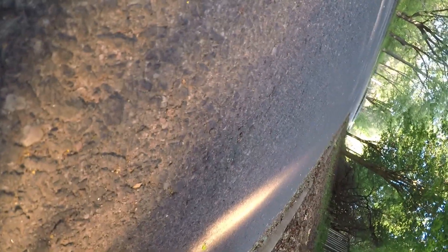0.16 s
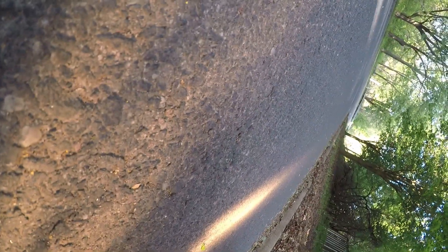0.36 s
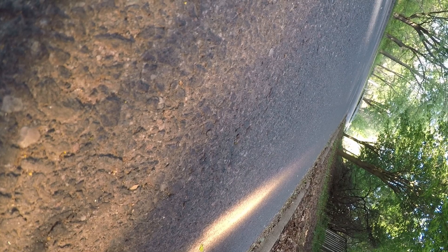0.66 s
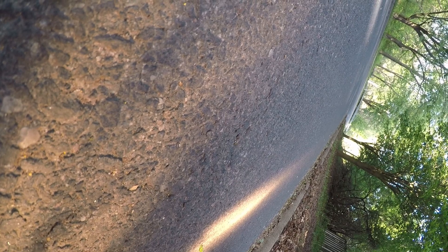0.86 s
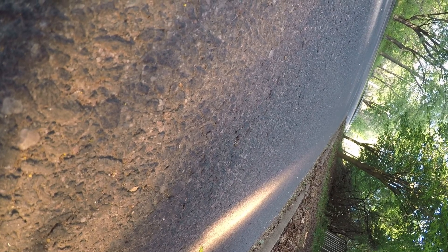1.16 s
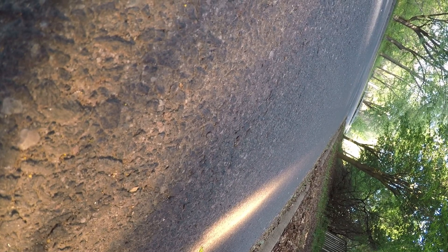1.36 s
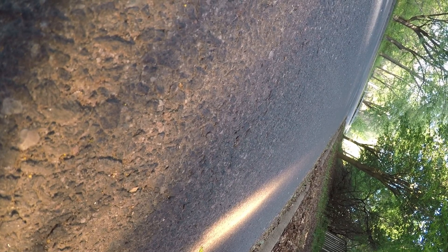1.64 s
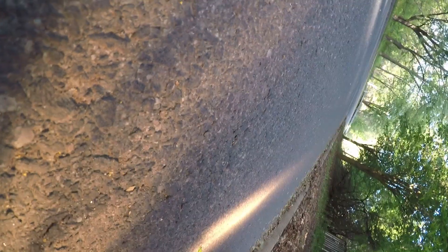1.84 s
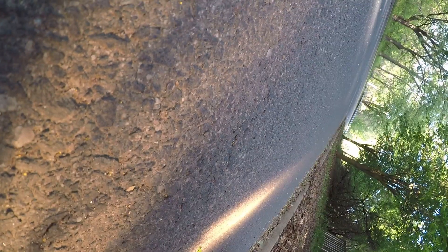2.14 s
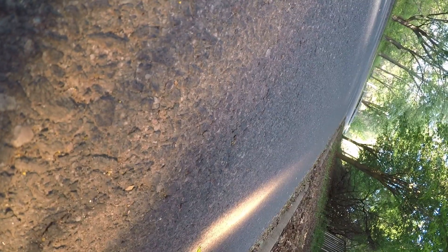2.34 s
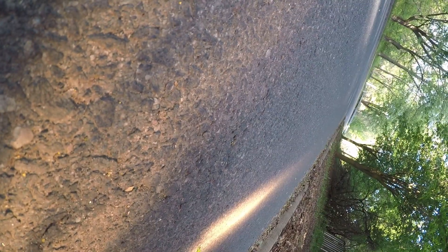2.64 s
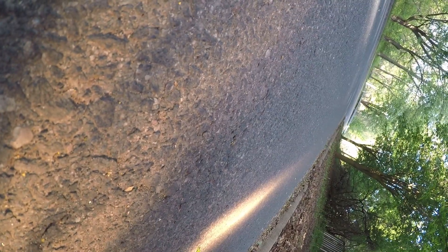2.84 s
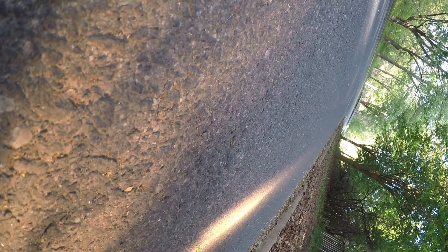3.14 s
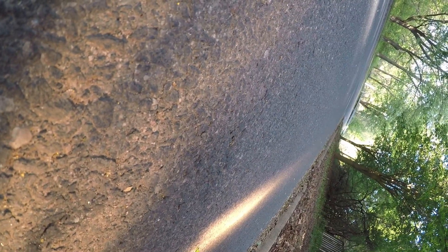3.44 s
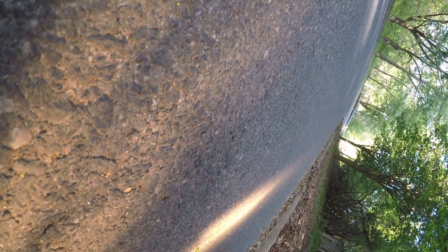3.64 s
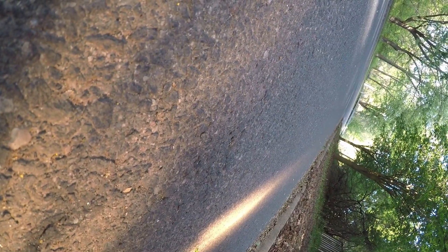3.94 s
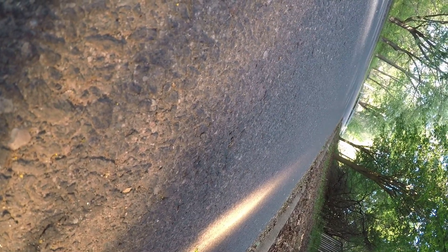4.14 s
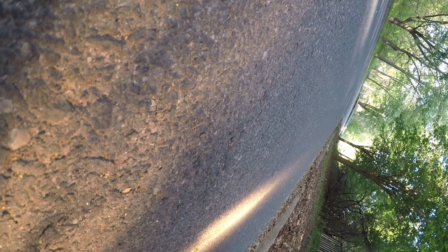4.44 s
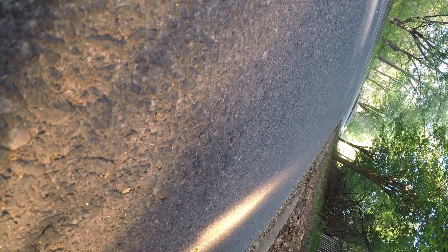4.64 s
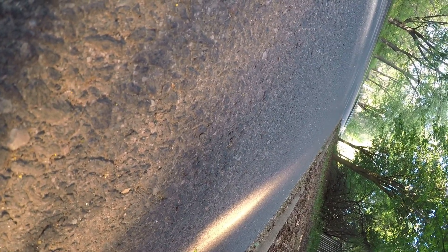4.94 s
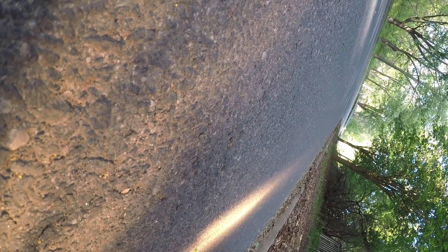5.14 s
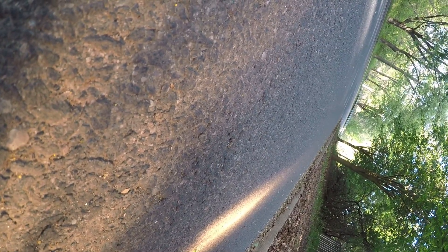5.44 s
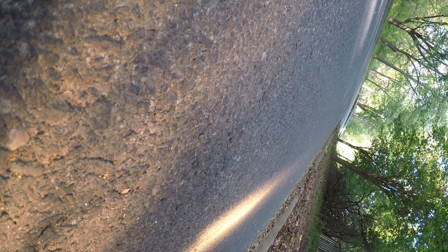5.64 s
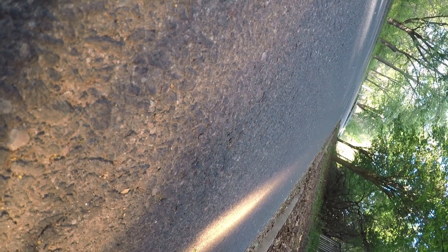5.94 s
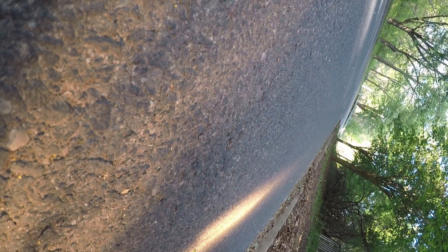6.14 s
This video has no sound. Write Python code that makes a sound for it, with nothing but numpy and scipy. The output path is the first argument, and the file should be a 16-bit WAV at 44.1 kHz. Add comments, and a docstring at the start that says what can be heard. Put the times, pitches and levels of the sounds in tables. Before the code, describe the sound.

A twin-cylinder motorcycle lying on a road, heard very close from microphones fixed to it. Revs fall quickly to idle while grit scrapes and crackles. The low engine hum swells, a knock and falling thud briefly knock it down, then it grows again into a steady, throbbing, rattling idle with loose metal clanks. Near the end the revs sag under heavy knocks and a cluster of clanks.

```python
"""A twin-cylinder motorcycle lies on its side on a road, heard by two microphones fixed to it. First the revs
fall to idle while loose bits scrape; from half a second on the level swells. At 1.7 s knocks and a falling thud
land, the level dips, then swells again over an even, humming idle. Near the end the revs sag under more knocks
and the level falls. Loose clanks come throughout. Crank tones and noise-driven modes of frame and housing carry
the engine, often in opposite phase."""
import sys
import numpy as np
from scipy import signal
from scipy.fft import rfft, irfft, next_fast_len
from scipy.io import wavfile

SR = 44100
rng = np.random.default_rng(int(sys.argv[2]) if len(sys.argv) > 2 else 0)


def materialize(psi):
    """Save the field psi as 16-bit PCM at rate SR to the path in sys.argv[1].

    A 1-D psi becomes a single channel; in a 2-D psi each row is a channel.
    """
    bounded = np.clip(np.atleast_2d(psi).T, -1, 1)
    quanta = np.round(bounded * 32767).astype(np.int16)
    wavfile.write(sys.argv[1], SR, quanta)


N = 277389
T = np.arange(N) / SR
SIZE = next_fast_len(N)
HZ = np.fft.rfftfreq(SIZE, 1 / SR)
FULL_DB = -51  # overall level at which the layer laws and crank tables hold
IDLE_LOW_HZ, IDLE_HIGH_HZ = 16, 16.5  # crank turns a second between which the engine idles evenly
FIRING = .72  # share of a turn at which the crank orders of hum and mount line up


def gain_of(db):
    """Amplitude factor of a level in dB."""
    return 10 ** (np.asarray(db) / 20)


def evened(x):
    """The signal scaled to rms 1."""
    return x / np.sqrt(np.mean(x ** 2) + 1e-20)


def follow(rows):
    """The columns of a table as curves over time."""
    s, *columns = np.transpose(rows)
    return [np.interp(T, s, c) for c in columns]


def wander(rate_hz, slowest_hz=0.3844):
    """Slow chance movement of rms 1: twelve sines of random phase up to rate_hz."""
    hz = np.geomspace(slowest_hz, rate_hz, num=12)[:, None]
    coarse = T[::200]
    waves = np.sin(2 * np.pi * (hz * coarse + rng.random(hz.shape)))
    return np.interp(T, coarse, evened(waves.sum(0)))


def both(tone, left_db, right_db, lead):
    """A complex tone as the two microphones get it; the left leads by the given phase."""
    left = gain_of(left_db) * (tone * np.exp(1j * lead)).real
    right = gain_of(right_db) * tone.real
    return np.array([left, right])


def bell(hz, centre_hz, width_hz):
    """A resonance applied twice, for steep skirts."""
    return 1 / (1 + 1j * (hz - centre_hz) / width_hz) ** 2


def response(hz, width_hz, left_db, right_db, lead):
    """Spectrum of one mode at the two microphones, for a noise drive of rms 1."""
    shape = bell(HZ, hz, width_hz)
    sides = np.array([[gain_of(left_db) * np.exp(1j * lead)], [gain_of(right_db)]])
    return sides * shape / np.sqrt(np.mean(abs(shape) ** 2))


def ring(modes, loudness, blows, apart):
    """Each mode is shaken by its own noise and the blows; extra noise differs between the microphones."""
    out, power = np.zeros((2, len(HZ)), complex), np.zeros((2, len(HZ)))
    for mode in modes:
        sides = response(*mode)
        noise = rfft(loudness * rng.standard_normal(N), SIZE)
        out += sides * (noise + blows)
        power += abs(sides) ** 2
    separate_noise = rfft(loudness * rng.standard_normal((2, N)), SIZE)
    out += apart * np.sqrt(power) * separate_noise
    return irfft(out, SIZE)[:, :N]


def obey(law, level_db, speed):
    """Strength of a layer in dB from the overall level and from how far the revs stray from idle."""
    full_db, share, racing_db, sagging_db = law
    racing = np.clip(speed - IDLE_HIGH_HZ, 0, 1)
    sagging = np.clip((IDLE_LOW_HZ - speed) / 2, 0, 1)
    return full_db + share * (level_db - FULL_DB) + racing_db * racing + sagging_db * sagging


# loose bits skittering on the road: (time [s], noise drive [dB], fade time [s])
GRIT = [(0.004, -72.5, 0.02), (0.025, -69.5, 0.016), (0.109, -78.5, 0.006), (0.115, -73, 0.018),
        (0.14, -76, 0.013), (0.157, -79.5, 0.01), (0.169, -77, 0.008), (0.193, -74.5, 0.016),
        (0.245, -77.5, 0.01), (0.261, -77, 0.02), (0.34, -78, 0.01), (0.361, -79.5, 0.015),
        (0.398, -75, 0.01)]
# small resonances the scrapes excite:
# (frequency [Hz], half-width at -6 dB [Hz], left gain [dB], right gain [dB], left lead [rad])
GRIT_RING = [(2250, 22, -4, -10, .1), (2910, 20, -10, -16, .1), (2900, 1700, 2.5, -1.5, 0.11),
             (5670, 420, -4, -9, .1)]
GRIT_SNAP_DB = 18  # the starting click, over the drive of its scrape


def grit():
    """Loose bits scrape the road: short crackling noise, each started by a click, in small resonances."""
    crackle = gain_of(2.3 * np.repeat(rng.standard_normal(N // 60 + 1), 60)[:N])
    loudness = sum(gain_of(db) * (T > s) * np.exp(-abs(T - s) / fade_s) for s, db, fade_s in GRIT)
    snaps = sum(gain_of(db + GRIT_SNAP_DB) * np.exp(-2j * np.pi * HZ * s) for s, db, _ in GRIT)
    return ring(GRIT_RING, loudness * crackle, snaps, apart=0.96)


# partials of a clank: (multiple of the pitch [ratio], left gain [dB], right gain [dB], left lead [rad])
CLANK_PARTIALS = [(1, 0, -4.5, 3.0), (1.48, -14, -22, 2.2)]
CLANK_RISE_S, CLANK_FADE_S = .001, .009


def clank(s, db, hz):
    """Struck loose metal: two short partials, the main one nearly opposite at the two microphones."""
    t = np.arange(round(8 * CLANK_FADE_S * SR)) / SR
    shape = gain_of(db) * (1 - np.exp(-t / CLANK_RISE_S)) * np.exp(-t / CLANK_FADE_S)
    partials = (both(shape * np.exp(2j * np.pi * k * hz * t), *sides) for k, *sides in CLANK_PARTIALS)
    return s, sum(partials)


def add(mix, s, sound):
    """Lay a sound into the mix at a time, cut at the end."""
    part = mix[:, round(s * SR):][:, :sound.shape[1]]
    part += sound[:, :part.shape[1]]


# something loose clanking against the covers: (time [s], level before rise and fade [dB], pitch [Hz])
CLANKS = [(0.454, -40, 640), (0.566, -47, 626), (1.706, -31, 593), (1.934, -36, 700), (2.115, -40, 760),
          (3.092, -32, 854), (4.213, -31, 990), (4.296, -33, 690), (5.003, -30, 1040), (5.307, -31, 710),
          (5.937, -45, 1310), (5.984, -29.5, 1010), (6.041, -33, 1000), (6.089, -46, 1360),
          (6.115, -31, 1033), (6.177, -29, 1012), (6.177, -46, 1490), (6.204, -48, 1360),
          (6.234, -45, 1340)]
# where in each crank turn a smaller clank may fall: (first place [turn], second place [turn])
CHATTER_SHARES = .52, .92
CHATTER_LOW_HZ, CHATTER_HIGH_HZ = 620, 1080
CHATTER_DB, CHATTER_SPREAD_DB = 15.5, 5.5  # over the overall level, and chance spread either way


def clanks(turns, level_db):
    """A loose part hits the covers: listed clanks, and two smaller ones a turn of chance size and pitch."""
    places = np.add.outer(np.arange(1, int(turns[-1])), CHATTER_SHARES).ravel()
    slips, sizes, pitches = rng.random((len(places), 3)).T
    times = np.interp(places + .05 * slips, turns, T)
    dbs = np.interp(times, T, level_db) + CHATTER_DB + CHATTER_SPREAD_DB * (2 * sizes - 1)
    pitches = CHATTER_LOW_HZ * (CHATTER_HIGH_HZ / CHATTER_LOW_HZ) ** pitches
    out = np.zeros((2, N))
    for row in list(CLANKS) + list(zip(times, dbs, pitches)):
        add(out, *clank(*row))
    return out


THUD_S, THUD_DB, THUD_FADE_S = 1.7114, -25.5, .066
THUD_TOP_HZ, THUD_END_HZ, THUD_FALL_S = 168, 35, .042
PUSH_S, PUSH_DB, PUSH_HZ, PUSH_LENGTH_S = 1.7275, -25, 55, .012


def thud():
    """A dull blow whose pitch falls as it dies, over a low shove."""
    t = np.maximum(T - THUD_S, 0)
    hz = THUD_END_HZ + (THUD_TOP_HZ - THUD_END_HZ) * np.exp(-(t / THUD_FALL_S) ** 2)
    phase = 2 * np.pi * np.cumsum(hz * (t > 0)) / SR
    blow = gain_of(THUD_DB) * np.exp(-(t / THUD_FADE_S) ** 2) * np.sin(phase)
    since_push = T - PUSH_S
    push_shape = gain_of(PUSH_DB) * np.exp(-(since_push / PUSH_LENGTH_S) ** 2)
    return blow + push_shape * np.cos(2 * np.pi * PUSH_HZ * since_push)


# blows on the frame: (time [s], strength over the overall level [dB], hardness as corner frequency [Hz])
KNOCKS = [(1.711, 27, 600), (1.722, 33, 520), (3.545, 30, 200), (5.888, 35, 150), (6.04, 40, 110),
          (6.135, 35, 110)]


def knocks():
    """Spectrum of the blows: harder ones reach higher."""
    return sum(gain_of(db) * np.exp(-2j * np.pi * HZ * s) / (1 + 1j * HZ / hard_hz) ** 2
               for s, db, hard_hz in KNOCKS)


# rocking modes of the whole machine:
# (frequency [Hz], half-width at -6 dB [Hz], left gain [dB], right gain [dB], left lead [rad])
BUMP = [(30.4, 1.9, 7.5, 13.5, 1.1), (68.4, 11, 21.5, 16.5, 2.4), (104.9, 1.6, 5.5, 19, 2.3),
        (147, 26, 11, 16.5, 0.17), (259.7, 15, 19.5, 13, 0.067), (323, 9.2, -9, 5, 0.35)]


def bump(blows):
    """A blow rocks the whole machine, which rings in its low modes."""
    return irfft(blows * sum(response(*mode) for mode in BUMP), SIZE)[:, :N]


def nearby(turns, speed, hz, width_hz):
    """The crank orders around a resonance: their total strength and their sum as one complex tone."""
    ks = np.arange(max(2, hz // 26), hz / 12 + 2)[:, None]
    weight = 1 / (1 + ((ks * speed[::2] - hz) / width_hz) ** 2)
    angle = 2 * np.pi * ks * (turns[::2] - FIRING) + 0.54 * wander(8)[::2]
    tone = np.sqrt(2) * (weight * np.exp(1j * angle)).sum(0)
    strength = np.sqrt((weight ** 2).sum(0))
    return np.interp(T, T[::2], strength), np.interp(T, T[::2], tone)


# resonances that lift whichever crank orders lie near them:
# (frequency [Hz], half-width at -6 dB [Hz], left gain [dB], right gain [dB], left lead [rad])
MOUNT = [(111.1, 3.3, 19.5, 1, 3.5), (237.3, 7.1, 7.5, 5, -0.5), (265.5, 4.8, 12.5, 6.5, -1.56),
         (279.8, 4.1, 3.5, 1, -2), (400.4, 7, 2.5, 6, 2.5), (642, 55, -4.5, -3.5, 3.5)]
# (strength at full level [dB], share of level changes [dB/dB], change racing [dB], change sagging [dB])
MOUNT_LAW = (-55, 0.84, -1, 4)


def mount(turns, speed, level_db):
    """The weaker resonances of the mount lift nearby crank orders, each wavering on its own."""
    out = np.zeros((2, N))
    for hz, width_hz, *sides in MOUNT:
        _, tone = nearby(turns, speed, hz, width_hz)
        out += gain_of(2.95 * wander(14, slowest_hz=3.)) * both(tone, *sides)
    return gain_of(obey(MOUNT_LAW, level_db, speed)) * out


# hum of the mount, dropping out now and then: (time [s], level before waver and microphone gains [dB])
HUM = [(0.0, -58), (0.25, -46), (0.46, -47), (0.51, -36), (0.9, -35.5), (1.3, -28.5), (1.7, -31.5),
       (1.725, -37), (1.79, -44), (1.87, -45), (1.95, -34), (2.35, -31.5), (2.63, -28.5), (2.76, -32.5),
       (3.0, -27.5), (3.5, -28), (3.57, -37), (3.68, -29.5), (4.22, -27), (4.3, -31), (4.5, -30),
       (4.9, -29), (5.3, -30.5), (5.82, -28), (5.9, -32.5), (6.03, -36), (6.13, -39), (6.29, -30.5)]
HUM_HZ, HUM_WIDTH_HZ = 145.8, 1.4
HUM_LEFT_DB, HUM_RIGHT_DB, HUM_LEAD = -6.5, 2, -0.61  # microphone gains; radians by which left leads
HUM_WAVER_DB, HUM_WAVER_HZ = 3.5, 18  # chance dips, never peaks
HUM_THROB = 0.036  # depth of its swell once a turn


def hum(turns, speed):
    """The strongest resonance of the mount hums on the crank orders near it; the nearest order wins."""
    level_db, = follow(HUM)
    strength, tone = nearby(turns, speed, HUM_HZ, HUM_WIDTH_HZ)
    dips_db = HUM_WAVER_DB * np.maximum(wander(HUM_WAVER_HZ, slowest_hz=4.), 0) ** 2
    throb = 1 + HUM_THROB * np.cos(2 * np.pi * (turns - FIRING))
    return gain_of(level_db - dips_db) * throb * both(tone / strength, HUM_LEFT_DB, HUM_RIGHT_DB, HUM_LEAD)


# combustion tones: (crank order [per turn], left gain [dB], right gain [dB], left lead [rad])
COMBUSTION = [(5, 0, 1, -2.53), (6, -14, -10, 1), (7, -14, -9, 1), (12, -12, -17, -.75)]
# (strength at full level [dB], share of level changes [dB/dB], change racing [dB], change sagging [dB])
COMBUSTION_LAW = (-37.5, 0.4, -2, -2)


def combustion(turns, speed, level_db):
    """Firing pulses as tones locked to the crank; the higher ones waver more."""
    out = np.zeros((2, N))
    for k, left_db, right_db, lead in COMBUSTION:
        angle = 2 * np.pi * k * (turns - .25) + 4.33 + 0.0082 * k * wander(4.2)
        tone = np.sqrt(2) * np.cos([angle + lead, angle])
        waver = gain_of(0.54 * np.sqrt(k) * wander(8.6, slowest_hz=1.6))
        out += gain_of([[left_db], [right_db]]) * waver * tone
    return gain_of(obey(COMBUSTION_LAW, level_db, speed)) * out


def swept(order, table, turns, speed, waver_db, slip):
    """One crank order whose strength and phase at each microphone depend on the revs."""
    rate, *columns = np.transpose(table)
    left_db, right_db, lead = (np.interp(speed, rate, c) for c in columns)
    angle = 2 * np.pi * order * (turns - .25) + 5.1 + slip * wander(12.0)
    tone = np.sqrt(2) * np.exp(1j * angle)
    return gain_of(waver_db * wander(3.3, slowest_hz=5.1)) * both(tone, left_db, right_db, lead)


# orders 2, 3 and 4 as the revs carry them past the frame's resonances, at full overall level: # (crank speed
# [turns/s], left level [dB], right level [dB], left lead [rad])
ROCKING = [(13, -38, -30, 4.0), (14.9, -46, -35, 3.5), (16.2, -39.5, -41.5, 2.25), (17, -46, -43, .6),
           (20, -44, -36, 1.8), (24.5, -37, -34, 2.5)]
GALLOP = [(13, -50, -44, 3.6), (16.3, -58, -51, 2.85), (18, -54, -52, 2.5), (21, -45, -46, 3),
          (24.5, -46, -44, 2.5)]
SHUDDER = [(13, -43, -42, 2.5), (15, -44, -41, 2.4), (16.2, -33.5, -32.5, 2.84), (17.2, -37, -32, 2.8),
           (19, -40, -34, 2.5), (21.6, -25.5, -37, 3.05), (23.3, -40, -36, 4), (24.6, -27.5, -42, 5)]
# brief surges of the shudder: (time [s], lift [dB])
SURGES = [(1.78, 6.6), (2.78, 5.3), (3.6, 7), (5.76, 4.9)]
SURGE_S = 0.032
SWEPT_SHARE = 0.26  # share of overall level changes that these orders follow


def low_orders(turns, speed, level_db):
    """The turning crank shakes the frame at two, three and four times its rate."""
    surge_db = sum(db * np.exp(-((T - s) / SURGE_S) ** 2) for s, db in SURGES)
    shaking = swept(2, ROCKING, turns, speed, waver_db=.15, slip=.02)
    shaking += swept(3, GALLOP, turns, speed, waver_db=.5, slip=.05)
    shaking += gain_of(surge_db) * swept(4, SHUDDER, turns, speed, waver_db=.9, slip=.08)
    return shaking * gain_of(SWEPT_SHARE * (level_db - FULL_DB))


def rattle(turns, bursts, fade_turns, spread_db, tap_db):
    """Loudness over the crank turn (steady part plus dying bursts) and the taps that start the bursts."""
    loudness, taps = np.ones(N), np.zeros(N)
    for share, db in bursts:
        since = turns - share + 1
        sizes = gain_of(db + spread_db * rng.standard_normal(200))[since.astype(int)]
        loudness += sizes * np.exp(-(since % 1) / fade_turns)
        starts = np.diff(np.floor(since), prepend=np.floor(since[0]))
        taps += gain_of(tap_db) * sizes * starts
    return evened(loudness), rfft(taps, SIZE)


# modes of the frame:
# (frequency [Hz], half-width at -6 dB [Hz], left gain [dB], right gain [dB], left lead [rad])
FRAME = [(65, 4.9, -4.5, -11.5, 0.5), (114.5, 22, 17, -12.5, 5), (167, 54, -9.5, 4, 10.5),
         (176.7, 15, 5.5, -15, 3.5), (199.8, 35, -1.5, -4.5, 0.5), (237.7, 11.1, 9, 3, -1),
         (263.8, 12.4, 13, 2, -1.17), (283.1, 11, -1, -3.5, -1), (316.2, 9.5, -1.5, -8.5, -1.46),
         (404.1, 22.7, 5, 9.5, 3.5), (476, 73, -5, 1, 2.5)]
# bursts in each crank turn: (place [turn], size over the steady rattle [dB])
FRAME_BURSTS = [(0.1, 1.2)]


def frame(turns):
    """The frame's low modes, shaken by noise that swells once a turn."""
    loudness, taps = rattle(turns, FRAME_BURSTS, fade_turns=0.2, spread_db=0, tap_db=2.5)
    return ring(FRAME, loudness, taps, apart=0.22)


# modes of the covers:
# (frequency [Hz], half-width at -6 dB [Hz], left gain [dB], right gain [dB], left lead [rad])
COVERS = [(550, 50, -8, -8, 2.6), (630, 13, 2.5, 2.5, 2.9), (657, 9, 1, 2, 2.8), (688, 12, 3, 0.5, 2.6),
          (755, 34, 1, 2, 2.9), (805, 9, -2.5, -1.5, 2.8), (845, 13, 0, 0, 2.9), (877, 13, 1.5, 1.5, 2.9),
          (950, 36, 4.5, 4, 3), (1000, 11, 0, -1, 3.05), (1038, 32, 5, 1.5, 3.05), (1090, 28, -1, -5, 3.1),
          (1135, 35, -9, -17, 1.5)]
# bursts in each crank turn: (place [turn], typical size over the steady rattle [dB])
COVER_BURSTS = [(.53, 8.5), (0.88, 3.5), (0.93, 9.5), (0.2, 1)]
# on top of the overall level: # (strength at full level [dB], share of level changes [dB/dB], change racing
# [dB], change sagging [dB])
COVERS_LAW = (-1.5, 0.1, 1.2, -2)
COVERS_BLOW_DB = 6  # thin metal answers a blow more readily than the frame


def covers(turns, speed, level_db, blows):
    """Thin covers rattle in short bursts each turn and ring under the blows."""
    loudness, taps = rattle(turns, COVER_BURSTS, fade_turns=0.013, spread_db=3.0, tap_db=17.5)
    ringing = ring(COVERS, loudness, taps + gain_of(COVERS_BLOW_DB) * blows, apart=0.2)
    return gain_of(obey(COVERS_LAW, level_db, speed)) * ringing


# modes of the panel:
# (frequency [Hz], half-width at -6 dB [Hz], left gain [dB], right gain [dB], left lead [rad])
PANEL = [(1255, 18, -7, -9, 3), (1298, 22, -5, -17, 2.2), (1342, 20, -4.5, -12, 1.7),
         (1400, 28, -9, -16, 1.5), (1455, 13, -8, -24, 1), (1520, 28, -13, -21, 2.8),
         (1820, 240, -9, -13, 2.97), (1996, 30, -21, -23, 2), (2300, 250, -15.5, -16.5, 1.9)]
# bursts in each crank turn: (place [turn], typical size over the steady rattle [dB])
PANEL_BURSTS = [(0.06, 6.2), (0.55, 0.85), (0.4, 2.1), (.7, 1.6)]
PANEL_DB, PANEL_BLOW_DB = -0.95, 8  # gain of the whole panel; extra drive from the blows


def panel(turns, blows):
    """A thin panel rattles in longer bursts each turn and rings under the blows."""
    loudness, taps = rattle(turns, PANEL_BURSTS, fade_turns=0.19, spread_db=3.0, tap_db=13.0)
    return gain_of(PANEL_DB) * ring(PANEL, loudness, taps + gain_of(PANEL_BLOW_DB) * blows, apart=0.62)


# modes of the housing:
# (frequency [Hz], half-width at -6 dB [Hz], left gain [dB], right gain [dB], left lead [rad])
HOUSING = [(3247, 51, -8, -12.5, .2), (3300, 740, -2.5, -6.5, 0.18), (4044, 59, -3.5, -7, 0.82),
           (4810, 900, -1, -0.5, 1.34), (5600, 91, 0.5, -0.5, 2.62), (5944, 79, -2.5, 1.5, 1.8),
           (6280, 310, 1, -1.5, 1.83), (7050, 280, 4, 4, 3.3), (7830, 300, -7.5, -5, 8.8),
           (8550, 120, -25.5, -11.5, 1.1), (9430, 1300, -11, -8.5, 2.21), (10700, 330, -22, -32, 20),
           (12300, 400, -41.5, -33.5, 1.1), (13900, 2500, -25.5, -25, 4.1)]
# bursts in each crank turn: (place [turn], typical size over the steady rattle [dB])
HOUSING_BURSTS = [(0.94, 1.3), (0.31, 1.3), (0.64, 0.83)]
# on top of the overall level: # (strength at full level [dB], share of level changes [dB/dB], change racing
# [dB], change sagging [dB])
TREBLE_LAW = (-17, 0.07, -1, -4)


def housing(turns, speed, level_db, blows):
    """The housing's treble modes rattle in short bursts each turn and flicker a little."""
    loudness, taps = rattle(turns, HOUSING_BURSTS, fade_turns=0.013, spread_db=3.5, tap_db=9.5)
    treble_db = obey(TREBLE_LAW, level_db, speed) + 0.55 * wander(19)
    return gain_of(treble_db) * ring(HOUSING, loudness, taps + blows, apart=0.53)


# revs: (time [s], crank speed [turns/s])
SPEED = [(0.0, 24.9), (0.26, 20.2), (0.42, 17.1), (0.58, 15.95), (1.0, 16.22), (1.55, 16.32), (1.75, 16.76),
         (1.95, 16.45), (2.75, 16.46), (3.0, 16.12), (3.4, 16.22), (3.55, 15.73), (3.8, 16.11), (4.9, 16.5),
         (5.35, 16.42), (5.74, 16.11), (5.85, 14.89), (5.94, 12.5), (6.29, 13.06)]
# overall level, to which the modes and blows are relative: (time [s], level [dB])
LEVEL = [(0.03, -64), (0.15, -66.5), (0.5, -65), (1, -58), (1.4, -54.5), (1.715, -52.5), (1.74, -57),
         (1.9, -59), (2.1, -58.5), (2.45, -54.5), (2.95, -52), (3.5, -51.5), (4.0, -51.5), (5, -49.5),
         (5.65, -51), (5.95, -53), (6.1, -58), (6.2, -57), (6.25, -61.5)]


def scene():
    """The idling engine shakes its body and mount, among grit, clanks and blows."""
    speed, = follow(SPEED)
    level_db, = follow(LEVEL)
    turns = .26 + np.cumsum(speed) / SR
    blows = knocks()
    loose = grit() + clanks(turns, level_db)
    mounted = mount(turns, speed, level_db) + hum(turns, speed)
    crank = combustion(turns, speed, level_db) + low_orders(turns, speed, level_db)
    body = bump(blows) + frame(turns)
    body += covers(turns, speed, level_db, blows)
    body += panel(turns, blows)
    body += housing(turns, speed, level_db, blows)
    return loose + thud() + mounted + crank + gain_of(level_db) * body


EDGE_HZ = 15700


def record(dry):
    """A soft start, then a steep low-pass at the band limit."""
    soft = dry * np.minimum(T / .004, 1)
    lowpass = signal.firwin(511, EDGE_HZ, window=("kaiser", 9), fs=SR)
    return signal.oaconvolve(soft, lowpass[None], "same")


dry = scene()
out = record(dry)
materialize(out)
```